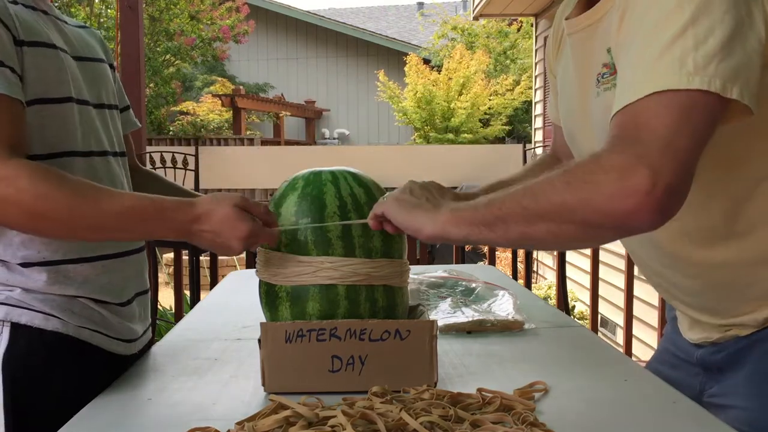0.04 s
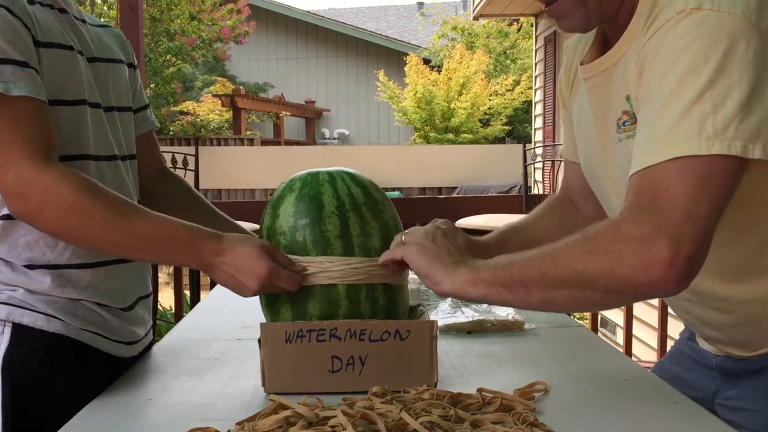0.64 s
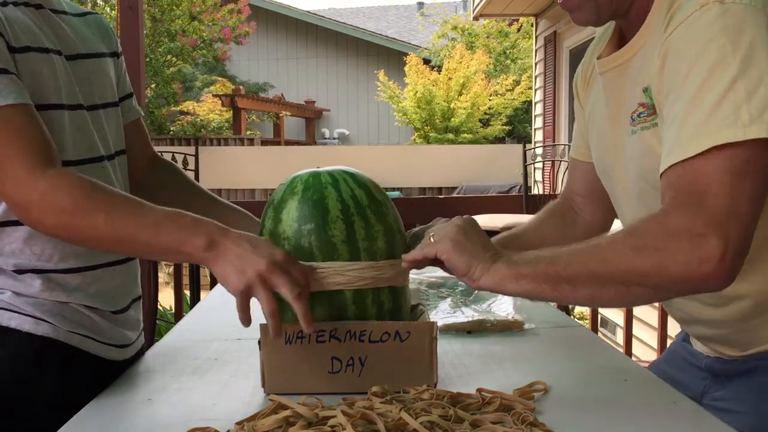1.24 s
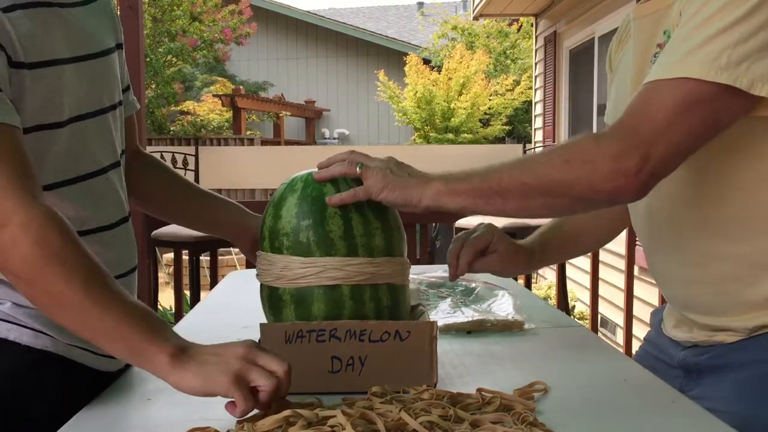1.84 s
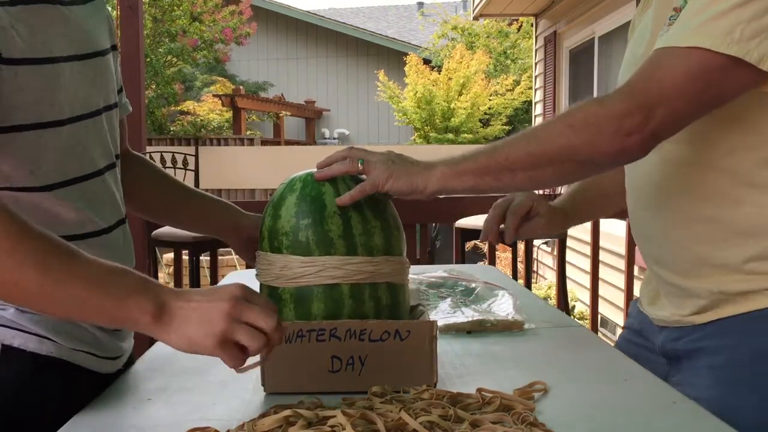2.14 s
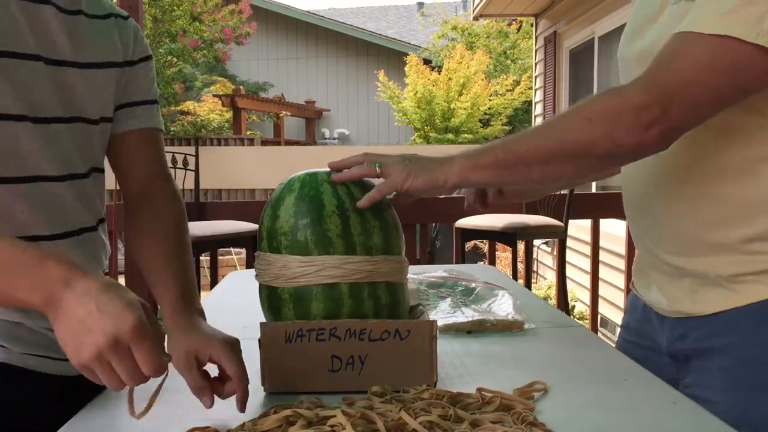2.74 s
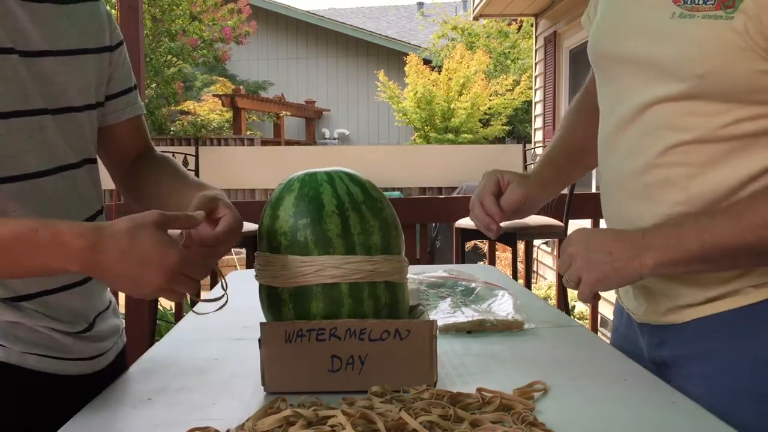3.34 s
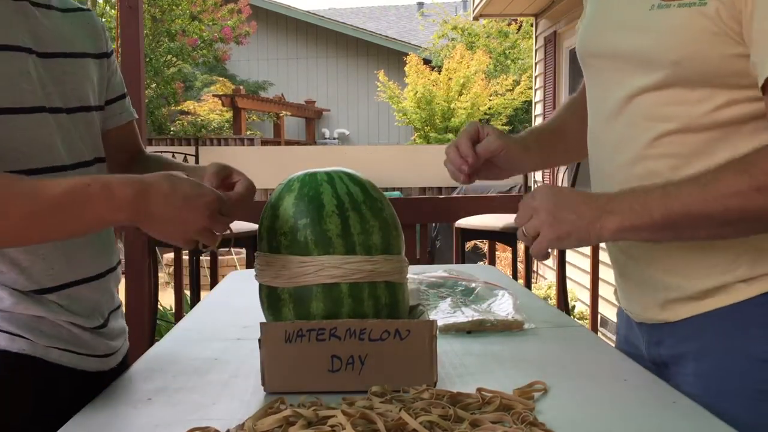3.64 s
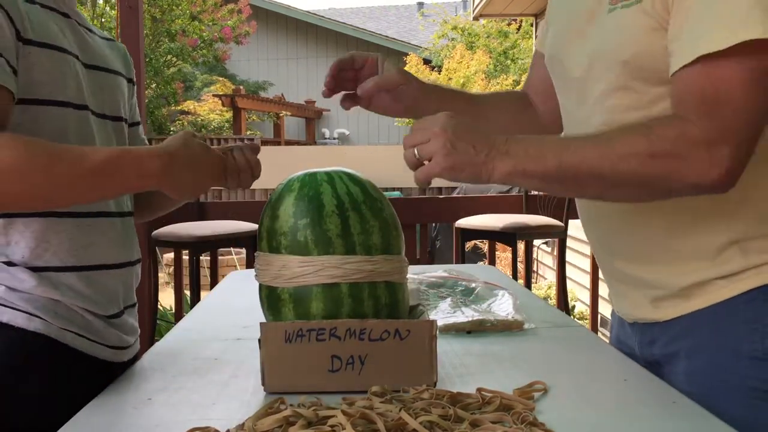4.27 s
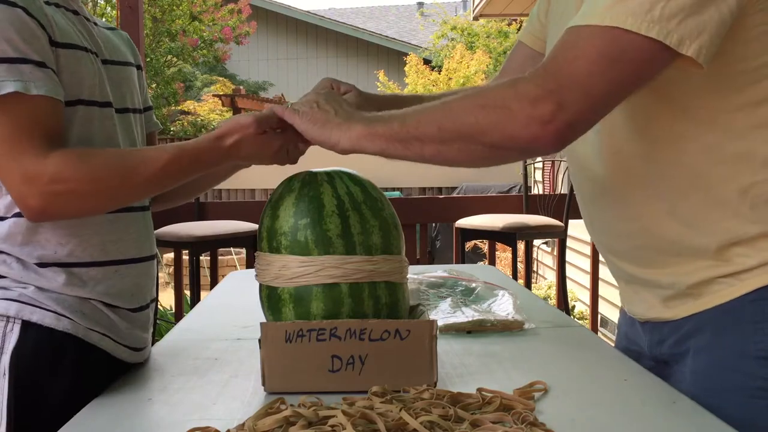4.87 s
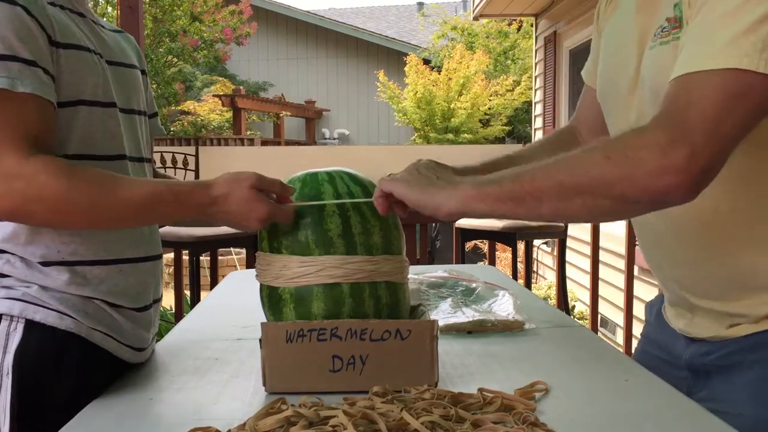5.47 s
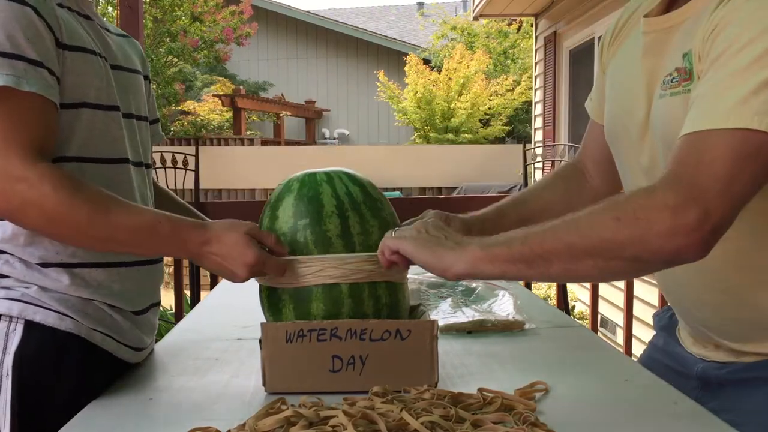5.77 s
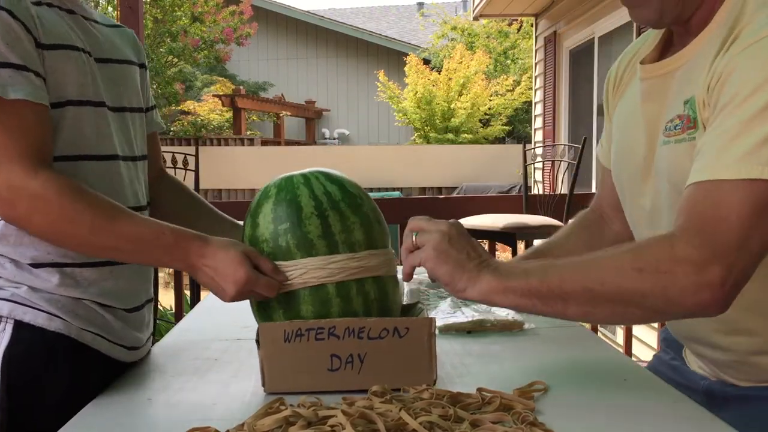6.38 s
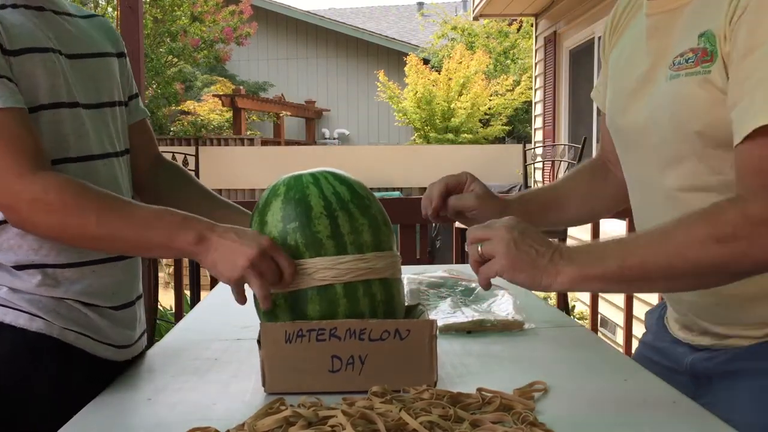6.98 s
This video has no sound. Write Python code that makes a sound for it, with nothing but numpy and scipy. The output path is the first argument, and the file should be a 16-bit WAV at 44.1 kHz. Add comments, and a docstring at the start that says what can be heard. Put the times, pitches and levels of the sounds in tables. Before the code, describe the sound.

Light, irregular snaps of rubber bands landing on a melon rind, with soft rubbing and a faint motor hum outdoors.

```python
"""Rubber bands snap against a watermelon as two people stretch them over it on a covered deck.
Each band slaps the rind with a knock, a smack and a crack, then twangs as it goes slack.
Rubber squeaks and rasps as it sticks and slips, and bumps set the table and a cardboard box ringing.
The roof and house wall add a short echo. Behind it all, clothes rustle, air puffs past,
a motor hums and the yard hisses faintly."""
import sys
import numpy as np
from scipy import signal
from scipy.fft import rfft, irfft
from scipy.io import wavfile

SR = 44100
rng = np.random.default_rng(int(sys.argv[2]) if len(sys.argv) > 2 else 0)


def pcm_store(signal):
    """Save signal as 16-bit PCM."""
    levels = np.round(np.clip(np.atleast_2d(signal), -1, 1) * 32767)
    wavfile.write(sys.argv[1], SR, levels.astype(np.int16).T)


N = 318003
TIME = np.arange(N) / SR

# A band slaps the rind: (time [s], knock level [dB], knock pitch [Hz], smack level [dB],
# smack pitch [Hz], crack level [dB], patter fade time [s]). Levels in the tables are relative.
SNAPS = [(0.4064, -44.5, 1800, -47.5, 5500, -53, 0.0033), (0.4858, -42.5, 1700, -41.5, 5870, -42, 0.0023),
         (0.556, -57, 1410, -49, 3170, -56, 0.002), (0.5606, -40.5, 1400, -33.5, 2950, -38, 0.003),
         (0.709, -55, 1380, -58, 5750, -41, 0.0015), (0.7208, -50.5, 2200, -49.5, 3930, -36.5, 0.00085),
         (0.795, -61, 2000, -58.5, 2670, -61, 0.001), (1.0283, -42, 1770, -41, 4220, -38, 0.0015),
         (1.128, -60, 2010, -50, 4500, -50, 0.0014), (1.148, -59, 1080, -55, 3680, -51.5, 0.002),
         (1.162, -45, 1620, -56, 4500, -43.5, 0.0013), (1.1676, -38, 1640, -34, 3560, -35.5, 0.00048),
         (1.1736, -54, 1880, -44, 6140, -35, 0.00064), (1.1808, -61, 1990, -48.5, 3640, -40, 0.0008),
         (1.293, -50, 1500, -48, 3670, -39.5, 0.0012), (1.3012, -39.5, 1300, -45, 3940, -22, 0.0013),
         (1.3054, -34, 1770, -29.5, 3320, -28.5, 0.0007), (1.551, -36.5, 1590, -45.5, 3180, -43, 0.0022),
         (1.5952, -46, 1560, -57, 3400, -55, 0.0024), (1.716, -67, 1770, -58, 4200, -51, 0.0015),
         (1.7244, -55.5, 2000, -50.5, 3800, -50, 0.0017), (1.7343, -66, 1100, -50.5, 5500, -45, 0.0028),
         (1.804, -57, 1650, -56, 3130, -51.5, 0.0035), (1.8215, -34, 1580, -30, 3030, -34, 0.0015),
         (4.594, -58.5, 2050, -58, 6150, -53, 0.0012), (4.6025, -55.5, 2070, -56.5, 3200, -48, 0.0013),
         (4.74, -76, 1600, -53, 6100, -41.5, 0.0008), (4.7433, -50.5, 1450, -34.5, 3950, -51, 0.0006),
         (4.8863, -68, 2160, -58, 4500, -42.5, 0.00069), (5.269, -66, 1366, -65, 5340, -54, 0.0015),
         (5.3287, -84, 1380, -61, 3940, -67, 0.00067), (5.377, -70, 1100, -63, 3470, -61.5, 0.0005),
         (6.22, -60, 1590, -57, 4150, -52, 0.0012), (6.277, -49.5, 2200, -51, 5200, -47.5, 0.0053),
         (6.2962, -52, 1090, -49, 5850, -30.5, 0.00077), (6.3028, -41.5, 1100, -38, 3430, -26.5, 0.0023),
         (6.309, -45, 1100, -36, 3600, -41, 0.0022), (6.322, -30, 1900, -28.5, 4750, -20.5, 0.0011),
         (6.4685, -74, 1150, -59, 6000, -56, 0.0014), (6.569, -46.5, 1156, -57, 2870, -56, 0.0014),
         (6.5953, -53, 1900, -49, 5400, -39.5, 0.0012), (6.6648, -61, 2140, -63, 3310, -53, 0.0023),
         (6.7612, -55, 1900, -55, 4340, -54, 0.0015), (6.769, -52.5, 1450, -50, 4430, -50, 0.005),
         (6.864, -42, 1670, -40, 6230, -35, 0.0025), (7.0548, -49, 1850, -54, 2900, -48.5, 0.0025),
         (7.078, -24, 1300, -23, 3820, -26, 0.0013), (7.0952, -34, 1970, -38, 4750, -31.5, 0.0021),
         (7.155, -33.5, 1157, -32, 2540, -36, 0.0049)]
# Bright rings in the rubber's crack: (pitch [Hz], width [Hz], level [dB])
CRACK_RINGS = [(8700, 850, -11), (9530, 540, -6), (11400, 460, -9.5), (14000, 3200, -6.5)]
# A finger plucks a band: (time [s], level [dB], starting pitch [Hz], pitch drop [0-1], fade time [s])
PLUCKS = [(0.135, -50, 1000, 0.33, 0.0055), (0.402, -55, 654, 0.27, 0.027), (0.462, -58, 1060, 0.4, 0.011),
          (0.722, -48.5, 616, 0.24, 0.0056), (0.998, -42, 541, 0.2, 0.0056),
          (1.411, -51, 516, 0.09, 0.0092), (1.414, -53, 1034, 0.2, 0.0058), (5.384, -57, 530, 0.28, 0.015),
          (5.687, -57, 1056, 0.18, 0.0095), (5.712, -54, 530, 0.1, 0.0043), (6.136, -45, 727, 0.22, 0.0082),
          (6.238, -40.5, 886, 0.25, 0.011), (6.56, -41.5, 685, 0.14, 0.005),
          (6.568, -41.5, 930, 0.32, 0.0036), (6.868, -47.5, 1000, 0.52, 0.01),
          (7.096, -43, 667, 0.4, 0.0063)]
# Rubber squeaks under fingers: (time [s], length [s], level [dB], pitch [Hz], hoarseness [1 = full])
SQUEAKS = [(0.327, 0.028, -64, 2360, 0.44), (0.608, 0.02, -65, 2980, 0.9), (0.775, 0.026, -65.5, 2500, 0.8),
           (0.907, 0.031, -60.5, 2300, 0.43), (1.762, 0.042, -68, 3200, 0.8), (1.867, 0.06, -71, 3210, 0.6),
           (1.973, 0.022, -70, 2710, 0.74), (2.031, 0.044, -73, 3280, 0.6),
           (2.152, 0.026, -63.5, 2750, 0.4), (1.949, 0.034, -68, 633, 0.06), (2.4, 0.048, -67.5, 678, 0.56),
           (2.608, 0.028, -68.5, 640, 0.5), (3.514, 0.034, -71.5, 620, 0.37),
           (4.458, 0.03, -73.5, 626, 0.37), (2.642, 0.034, -66.5, 860, 0.52),
           (2.873, 0.029, -55, 2770, 0.58), (2.885, 0.045, -56, 3290, 0.36), (3.013, 0.039, -60, 755, 0.68),
           (3.657, 0.02, -68, 2360, 0.26), (5.087, 0.034, -68.5, 640, 0.36), (5.16, 0.021, -70, 2345, 0.3),
           (5.27, 0.033, -62.5, 658, 0), (5.409, 0.036, -63, 2830, 1), (5.418, 0.033, -62, 2340, 0.57),
           (5.634, 0.033, -66, 2560, 1.1), (5.753, 0.021, -57.5, 707, 0.52),
           (5.921, 0.041, -67.5, 2430, 0.4), (5.944, 0.048, -68, 600, 0.7),
           (6.059, 0.059, -66.5, 2500, 0.55), (6.728, 0.023, -58, 2760, 0.7)]
# Rubber drags over skin and rind, and a few short strokes are a band pattering on the rind: (time [s], length
# [s], level [dB], middle pitch [Hz])
RUBS = [(0.058, 0.11, -70, 7300), (0.265, 0.028, -51.5, 4180), (0.427, 0.031, -67, 6450),
        (0.604, 0.014, -56, 1490), (0.95, 0.25, -66.5, 3500), (1.016, 0.018, -51, 6000),
        (1.23, 0.023, -72, 3100), (1.515, 0.0069, -58.5, 1100), (1.559, 0.059, -50, 1720),
        (2.275, 0.021, -66.5, 2700), (2.429, 0.046, -53, 1900), (2.883, 0.075, -57, 1290),
        (3.82, 0.047, -69, 6000), (3.93, 0.022, -72, 5000), (4.301, 0.06, -58.5, 8000),
        (4.409, 0.016, -55, 8910), (4.604, 0.02, -57, 7350), (4.748, 0.036, -77, 3400),
        (4.91, 0.029, -63, 4240), (4.56, 0.052, -69, 750), (4.9, 0.097, -72, 700), (5.1, 0.057, -69, 905),
        (5.27, 0.03, -69, 1100), (5.54, 0.022, -64.5, 790), (5.969, 0.037, -53, 9300),
        (6.235, 0.04, -51.5, 4200), (6.302, 0.017, -39.5, 1070), (6.353, 0.11, -56, 1090),
        (6.58, 0.078, -65, 1320), (6.619, 0.011, -51.5, 9400), (7.079, 0.0084, -31, 1250),
        (7.162, 0.028, -39, 3000)]
# A hand bumps the melon or table: (time [s], table level [dB], hollow knock level [dB])
BUMPS = [(0.142, -50, -54), (1.525, -44.5, -62), (2.889, -46, -45), (2.917, -41, -41.5), (4.788, -69, -58)]
# Notes of the table top: (pitch [Hz], level [dB], time to fade by 60 dB [s])
TABLE_NOTES = [(122, -14, 0.35), (159.6, 3.5, 0.18), (196.2, -8, 0.14)]
# Notes of the hollow of table and box: (pitch [Hz], level [dB], time to fade by 60 dB [s])
HOLLOW_NOTES = [(218.6, -1, 0.12), (289.2, -3, 0.1202), (336.4, -5, 0.28), (545, -11, 0.15),
                (637.4, -15, 0.14), (929, -10, 0.11), (1142, -10.5, 0.11), (1544, -15, 0.12),
                (1900, -13, 0.09)]
# The deck's echo: (frequency [Hz], time to fade by 60 dB [s], level against the direct sound [dB])
DECK_ECHO = [(186, 0.5, 1), (570, 0.012, 2.5), (1660, 0.105, -7), (2500, 0.11, -5), (3500, 0.15, -6.5),
             (8000, 0.1004, -7), (16000, 0.09, -7)]
# The hands work a band down over the melon: (start [s], end [s])
BUSY_SPELLS = [(0.3, 1.88), (6.049, 7.9)]
# Tone of the rustling clothes: (frequency [Hz], level [dB])
RUSTLE_TONE = [(220, -19), (310, -4), (450, -0.5), (650, 5.5), (1200, -8), (2600, 2.5), (4500, -12),
               (9000, -8), (16000, -16.5)]
# Air moves past the microphone: (time [s], length [s], level [dB])
PUFFS = [(2.487, 0.24, -54.5), (4.601, 0.14, -60)]
# Tone of the steady outdoor air: (frequency [Hz], level [dB])
AIR_TONE = [(25, -8), (45, 3), (70, 6.5), (120, 4), (170, -3), (230, -17.5), (320, -5), (460, -21.5),
            (650, -30), (900, -20.5), (1700, -39), (2700, -45.5), (4000, -26), (6500, -21.5),
            (10500, -47.5), (15500, -33)]

SLIDE_S = 0.006  # a band slides this long before it lands


def snaps(spike, ring_spike=3.5, smack_gain_db=1.6):
    """A band slaps the melon: the rind thuds and knocks, the rubber smacks and cracks."""
    out = np.zeros(N)
    for start, knock_db, knock_hz, smack_db, smack_hz, crack_db, patter_s in SNAPS:
        thud = band(landing(0.01, spike), 380, 1300)
        width_hz = 720 * np.sqrt(1 + from_db(knock_db + 31))  # a harder knock has a less clear pitch
        knock = resonance(landing(0.0028, ring_spike), knock_hz, width_hz)
        knock = resonance(knock, knock_hz, width_hz)
        rubber_ring = rms_one(resonance(landing(patter_s, ring_spike), smack_hz, 0.23 * smack_hz))
        touch = landing(patter_s, spike)
        smack = band(rubber_ring + from_db(-8) * rms_one(band(touch, 2900, 5000)), 1700, 5800)
        crack = rms_one(band(touch, 5300, 17100))
        crack += sum(from_db(db) * rms_one(resonance(touch, hz, width)) for hz, width, db in CRACK_RINGS)
        # A band that lands flat patters longer and thuds more.
        thud_db = (knock_db + crack_db) / 2 + 3 * np.log2(patter_s / 0.0019) - 7
        rind = at_level(thud, thud_db) + at_level(bounce(knock, knock_hz), knock_db)
        rubber = at_level(bounce(smack, smack_hz), smack_db + smack_gain_db) + at_level(crack, crack_db)
        add(out, start - SLIDE_S, rind + rubber)
    return out


def landing(fade_s, spike):
    """The push of a band: it slides, lands with a sharp touch of size `spike`, then patters down."""
    t = (np.arange(SR // 40) - round(SLIDE_S * SR)) / SR
    slide = from_db(-21.5) * np.exp(-abs(t) / 0.00085)
    patter = np.exp(-abs(t) / fade_s)
    force = rng.standard_normal(len(t)) * np.where(t < 0, slide, patter)
    return force / np.linalg.norm(force) + spike * (t == 0)


def bounce(ring, hz, rough_gap_s=0.0013):
    """The band lands again, more softly and in step with the ring, which makes it last longer."""
    cycles = np.ceil(rough_gap_s * hz - .5)
    lag = round(cycles / hz * SR)
    return ring + rng.uniform(.2, .6) * np.pad(ring, (lag, 0))[:len(ring)]


def twangs(sag_s=0.016, gain_db=2):
    """A plucked or just-snapped band swings briefly, and its pitch falls as it goes slack."""
    out, t = np.zeros(N), TIME[:SR // 8]
    rise = 1 - np.exp(-t / 0.002)
    roughness = .36 + .3 * np.exp(-t / 0.0023)
    after_snaps = [(start + 0.00618, knock_db - 17.5, 721 * 2 ** rng.uniform(-.18, .18), 0.24, 0.0079)
                   for start, knock_db, *_ in SNAPS]  # same columns as PLUCKS
    for start, db, hz, drop, fade_s in PLUCKS + after_snaps:
        pitch = hz * (1 - drop * (1 - np.exp(-t / sag_s)))
        phase = 2 * np.pi * np.cumsum(pitch) / SR
        octave = from_db(-3) * np.exp(-t / 0.0046) * np.sin(2 * phase)
        flutter = roughness * rms_one(band_noise(len(t), hz / 2, 1.7 * hz))
        wave = np.sin(phase) + octave + flutter
        add(out, start, from_db(db + gain_db) * wave * rise * np.exp(-t / fade_s))
    return out


def squeaks(glide=0.045, gain_db=-0.5):
    """Rubber sticks and slips in a short, bending note: clear if the slips are even, hoarse if not."""
    out = np.zeros(N)
    faint_and_clear = [(*row, 0) for row in scattered(12, length_s=.018, db=-75.5, hz=2698.5, octaves=.6)]
    for start, length_s, db, hz, hoarse in SQUEAKS + faint_and_clear:
        n, hoarse = int(length_s * SR), min(hoarse, 1)
        pitch = hz * (1 + glide * rng.uniform(-1.5, 1) * np.linspace(-1, 1, n))
        even = rms_one(np.sin(2 * np.pi * np.cumsum(pitch) / SR))
        uneven = rms_one(band_noise(SR // 4, hz / 1.12, hz * 1.12)[-n:])
        note = ((1 - hoarse) * even + hoarse * uneven) * signal.windows.tukey(n, .8)
        add(out, start, from_db(db + gain_db) * rms_one(note))
    return out


def rubs(slip_s=.0012, slip_spread_db=4.5, gain_db=-4):
    """Dragged rubber makes tiny, uneven slips that blur into a short rasp."""
    out, t = np.zeros(N), TIME[:SR // 4]
    # A band scrapes off the fingers before a snap and settles on the rind after it. Columns as in RUBS.
    scrapes = [(start - 0.011, 0.011, max(smack_db, crack_db) - 20.5, 3500)
               for start, _, _, smack_db, _, crack_db, _ in SNAPS]
    settles = [(start, 0.069, smack_db - 22.5, 2240) for start, _, _, smack_db, *_ in SNAPS]
    # Fingertips flick off each pluck and fiddle with loose bands.
    flicks = [(start, 0.011, db - 14, 1000) for start, db, *_ in PLUCKS]
    fiddles = scattered(32, length_s=.03, db=-68, hz=2600, octaves=1)
    fading = RUBS + settles + flicks + fiddles
    for strokes, change_db in ((fading, -8), (scrapes, 9.5)):
        for start, length_s, db, hz in strokes:
            n = int(length_s * SR)
            sizes = from_db(slip_spread_db * rng.standard_normal(len(t)))[(t / slip_s).astype(int)]
            slips = rng.standard_normal(len(t)) * sizes
            body = rms_one(resonance(slips, hz, 0.54 * hz))
            hiss = rms_one(band(slips, min(900, hz / 2), 3 * hz))
            rasp = band(body + hiss, 210, 18500)[:n]
            shape = signal.windows.tukey(n, .2) * from_db(np.linspace(0, change_db, n))
            add(out, start, from_db(db + gain_db) * rms_one(rasp * shape))
    return out


def table_bumps(rise_s=0.0018, gain_db=-4):
    """Hand bumps and snaps set the loaded table top ringing."""
    out, t = np.zeros(N), TIME[:SR // 2]
    ring = sum(fading_note(t, hz, db, ring_s) for hz, db, ring_s in TABLE_NOTES)
    shakes = [(start, knock_db - 19.5) for start, knock_db, *_ in SNAPS]
    for start, db, *_ in BUMPS + shakes:
        add(out, start, from_db(db + gain_db) * ring * (1 - np.exp(-t / rise_s)))
    return out


def hollow_knocks(rise_s=0.0035):
    """Every blow rings the hollow of table and box; hard blows favour the high notes."""
    out, t = np.zeros(N), TIME[:SR // 3]
    soft = [(start, db, -1.5) for start, _, db in BUMPS]
    hard = [(start, knock_db - 21, 6.5) for start, knock_db, *_ in SNAPS]
    lowest_hz = HOLLOW_NOTES[0][0]
    for start, blow_db, db_per_octave in soft + hard:
        ring = 0
        for hz, db, ring_s in HOLLOW_NOTES:
            lift_db = db_per_octave * np.log2(hz / lowest_hz) + rng.normal(0, 2)
            ring += fading_note(t, hz, db + lift_db, ring_s)
        add(out, start, from_db(blow_db) * ring * (1 - np.exp(-t / rise_s)))
    return out


def deck_echo(sound, rise_s=0.0043, wall_s=0.0068, reflection_s=.0006):
    """Table, bodies, wall and roof scatter a short echo; the yard returns a faint, longer, duller one."""
    t, echo = TIME[:SR // 2], 0
    hz, ring_times, levels = np.transpose(DECK_ECHO)
    chance_db = 4.5 * np.minimum(rng.standard_normal(len(t)), 1.5)[(t / reflection_s).astype(int)]
    wall_db = 5 * (abs(t - wall_s) < 2 * reflection_s)
    reflections = from_db(chance_db + wall_db) * np.minimum(t / rise_s, 1) ** 2
    edges = np.geomspace(100, 18000, 12)
    for low, high in zip(edges, edges[1:]):
        log_middle = np.log(low * high) / 2
        ring_s = np.interp(log_middle, np.log(hz), ring_times)
        db = np.interp(log_middle, np.log(hz), levels)
        near = from_db(-60 * t / ring_s)
        far = from_db(-19 - 60 * t / 0.53 * (1 + low / 9000))
        tail = band(rng.standard_normal(len(t)) * reflections * (near + far), low, high)
        echo += from_db(db) * tail / np.linalg.norm(tail) * np.sqrt(2 * (high - low) / SR)
    return signal.fftconvolve(sound, echo)[:N]


def rustle(ramp_s=0.4):
    """Clothes rustle, with stray ticks of rubber and cloth; louder and busier while the hands work."""
    effort = sum(np.clip(np.minimum(TIME - start, end - TIME) / ramp_s + .5, 0, 1)
                 for start, end in BUSY_SPELLS)
    ticks_per_s = 12 + 40 * effort
    taps = rng.uniform(-1, 1, N) * (rng.random(N) < ticks_per_s / SR)
    ticks = band(signal.fftconvolve(taps, landing(fade_s=0.002, spike=0.2))[:N], 1016, 13000)
    flicker = from_db(2 * drift(35) + .8 * drift(9))
    cloth = shaped_noise(RUSTLE_TONE) * flicker
    return from_db(-77 + 5.5 * effort) * (cloth + from_db(12) * ticks)


def air_puffs():
    """Moving air gives brief, deep rumbles."""
    out = np.zeros(N)
    for start, length_s, db in PUFFS:
        n = int(length_s * SR)
        rumble = band_noise(SR, 36, 70)[-n:] * signal.windows.tukey(n, .5)
        add(out, start, from_db(db) * rms_one(rumble))
    return out


def motor_hum(hz=159.5, wander_hz=1.23):
    """A motor hums a wavering note over a low drone."""
    phase = 2 * np.pi * np.cumsum(hz + wander_hz * drift(8)) / SR
    tone = rms_one(np.sin(phase) + from_db(-22) * np.sin(2 * phase))
    drone = rms_one(band_noise(N, hz - 50, hz + 25))
    return from_db(-64) * tone + from_db(-68) * drone


def yard(flicker_db=3.7):
    """A faint hiss flickers in patches, and a hollow note comes and goes."""
    edges, hiss = 800 * 2 ** (np.arange(11) / 4), 0
    for low, high in zip(edges, edges[1:]):
        tilt_db = np.log2(low / edges[0])  # 1 dB louder each octave up
        hiss += rms_one(band_noise(N, low, high)) * from_db(tilt_db + flicker_db * drift(40))
    hollow = band_noise(N, 600, 710) * from_db(8 * np.tanh(drift(17)))
    return from_db(-73) * rms_one(hiss) + from_db(-78) * rms_one(hollow)


def scattered(count, length_s, db, hz, octaves):
    """Small sounds strewn over the whole time: (time [s], length [s], level [dB], pitch [Hz])."""
    return [((k + when) / count * N / SR, length_s, db + 6 * (loud - .5), hz * 2 ** (octaves * (high - .5)))
            for k, (when, loud, high) in enumerate(rng.random((count, 3)))]


def fading_note(t, hz, db, ring_s):
    """A pure note that fades by 60 dB in ring_s."""
    return from_db(db - 60 * t / ring_s) * np.sin(2 * np.pi * hz * t)


def band(x, low_hz, high_hz):
    """Keep the part of a sound between two frequencies."""
    return signal.sosfilt(signal.butter(2, [low_hz, min(high_hz, .45 * SR)], "band", fs=SR, output="sos"), x)


def band_noise(n, low_hz, high_hz):
    """Noise between two frequencies, n samples long."""
    return band(rng.standard_normal(n), low_hz, high_hz)


def resonance(x, hz, width_hz):
    """Make a sound ring at one pitch; a narrower width rings longer."""
    r = np.exp(-np.pi * width_hz / SR)
    return signal.lfilter([1, 0, -1], [1, -2 * r * np.cos(2 * np.pi * hz / SR), r * r], x)


def shaped_noise(tone):
    """Steady noise whose lows and highs follow a table."""
    hz, db = np.transpose(tone)
    bins = np.maximum(np.fft.rfftfreq(N, 1 / SR), 1)
    gain = from_db(np.interp(np.log(bins), np.log(hz), db)) * np.minimum(bins / hz[0], 1) ** 2
    return rms_one(irfft(rfft(rng.standard_normal(N)) * gain, N))


def drift(turns_per_s):
    """A random wander with a typical size of 1."""
    return rms_one(np.interp(TIME * turns_per_s, np.arange(4000), rng.standard_normal(4000)))


def from_db(db):
    """Turn decibels into a multiplier."""
    return 10 ** (np.asarray(db) / 20)


def rms_one(x):
    """Scale to an average strength (rms) of 1."""
    return x / np.sqrt(np.mean(x ** 2) + 1e-20)


def at_level(hit, db, contact_s=0.003):
    """Give a hit the energy of a sound held at this level for contact_s."""
    return hit / np.linalg.norm(hit) * np.sqrt(contact_s * SR) * from_db(db)


def add(out, start_s, sound):
    """Mix a sound in at a time."""
    i = max(round(start_s * SR), 0)
    out[i:i + len(sound)] += sound[:max(N - i, 0)]


def scene():
    """Snaps and handling sounds with their echo, over the quiet background."""
    handling = twangs() + rubs() + table_bumps() + squeaks()
    direct = snaps(spike=0.6)
    # The echo gathers a snap from all directions, which evens out its tone; a bigger spike does that.
    echo = deck_echo(handling + snaps(spike=1.1))
    background = yard() + motor_hum() + rustle() + air_puffs() + from_db(-67) * shaped_noise(AIR_TONE)
    return (direct + handling + hollow_knocks() + echo + background)[None]


def record(dry):
    """The microphone drops the deepest bass and steeply cuts the highest treble."""
    thinned = signal.sosfilt(signal.butter(4, 36, "high", fs=SR, output="sos"), dry)
    return signal.sosfilt(signal.ellip(10, .3, 70, 16000, fs=SR, output="sos"), thinned)


dry = scene()
out = record(dry)
pcm_store(out)
```